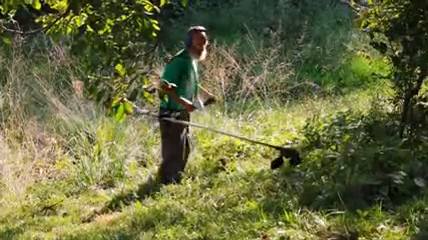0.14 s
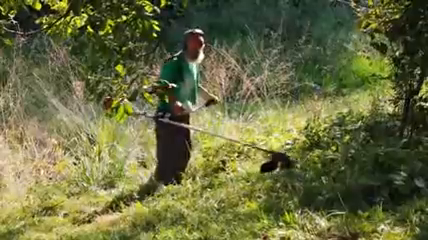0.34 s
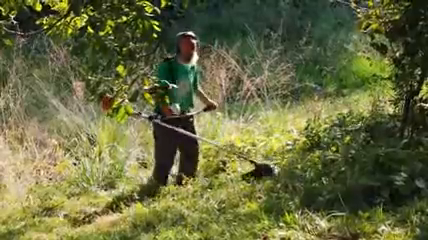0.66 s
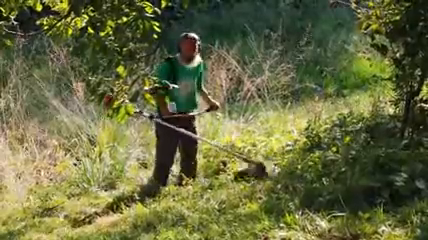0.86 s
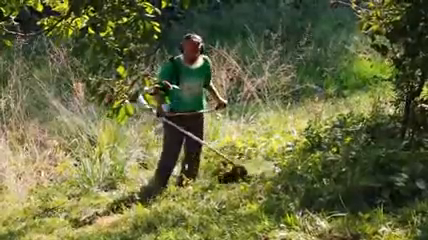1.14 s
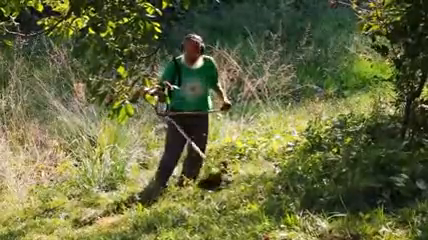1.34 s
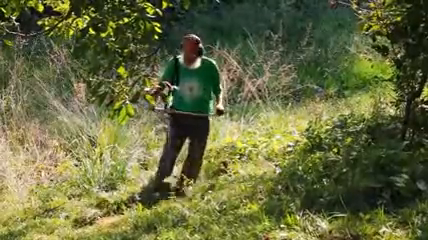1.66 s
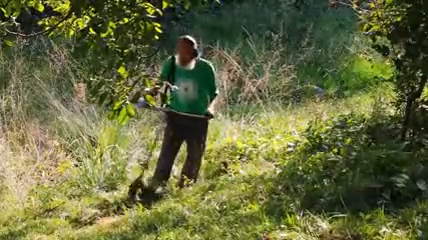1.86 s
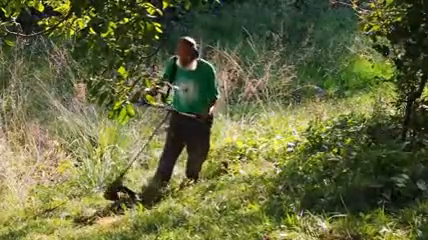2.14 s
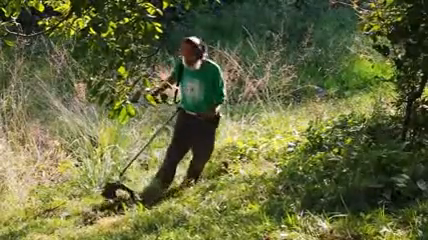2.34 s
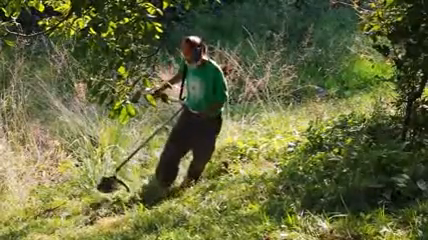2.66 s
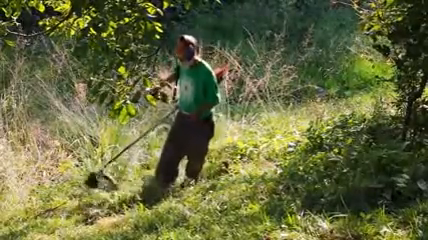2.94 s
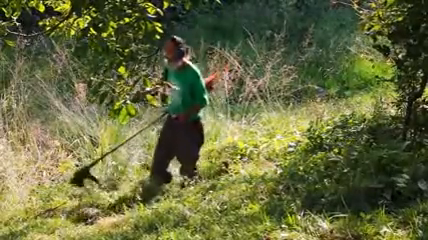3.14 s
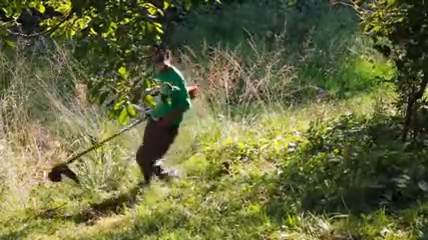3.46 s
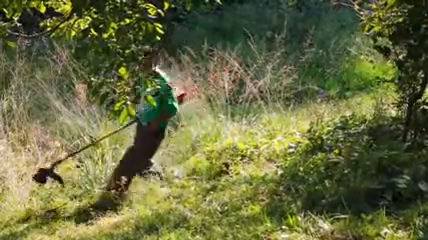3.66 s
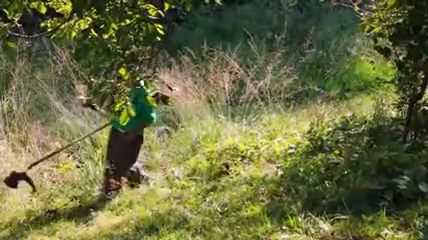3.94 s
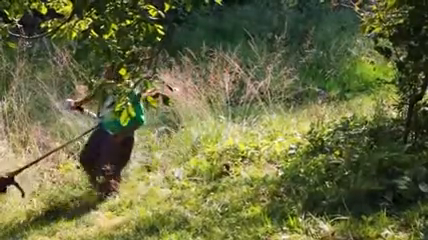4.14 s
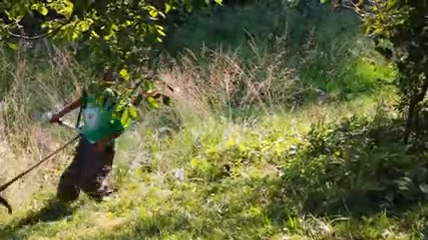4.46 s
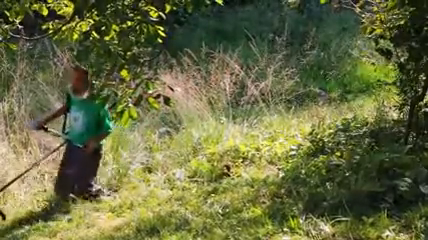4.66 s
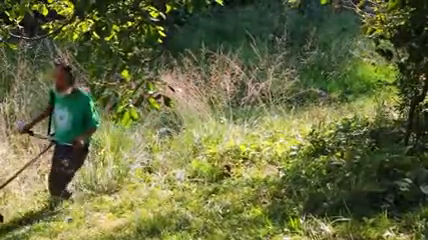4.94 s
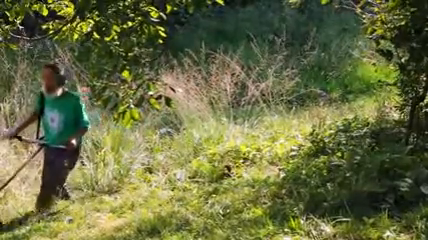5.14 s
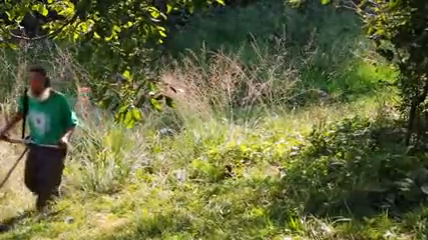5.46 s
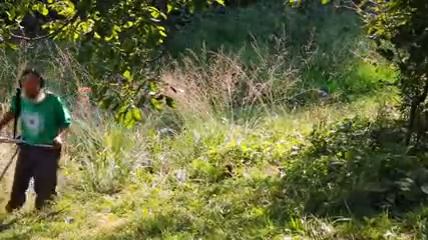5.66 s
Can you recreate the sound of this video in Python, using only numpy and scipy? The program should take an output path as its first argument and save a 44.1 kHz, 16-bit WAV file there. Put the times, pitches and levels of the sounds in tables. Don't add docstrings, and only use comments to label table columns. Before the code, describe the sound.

A brush cutter swings through long grass on an open slope, mono, close and dry. The continuous buzz and airy hiss sag slightly in pitch under load. Sharp woody snaps cluster early, with scattered ticks afterwards. Soft low rustle and wind thumps lie beneath. As the machine turns, its engine roar and high whine grow, then ease; the line tips fizz brighter at the end.

```python
import sys
import numpy as np
from scipy import signal
from scipy.io import wavfile
from scipy.ndimage import uniform_filter1d

SR = 44100
rng = np.random.default_rng(int(sys.argv[2]) if len(sys.argv) > 2 else 0)


def volts_from_db(level):
    exponent = np.asarray(level, float) / 20
    return 10 ** exponent


def materialize(psi):
    bounded = np.clip(np.atleast_2d(psi).T, -1, 1)
    quanta = np.round(bounded * 32767).astype(np.int16)
    wavfile.write(sys.argv[1], SR, quanta)


N = 255780


def evened(x):
    return x / np.sqrt(np.mean(x ** 2) + 1e-20)


def curves(rows):
    s, *columns = np.transpose(rows)
    return [np.interp(np.arange(N) / SR, s, c) for c in columns]


def bell(s, half_s):
    coarse_s = np.arange(0, N, 16) / SR
    return np.repeat(np.exp(-((coarse_s - s) / half_s) ** 2), 16)[:N]


def swells(rows):
    return sum(volts_from_db(db) * bell(s, half_s) for s, half_s, db in rows)


def drift(per_s):
    knots = uniform_filter1d(rng.standard_normal(400), 3)
    return evened(np.interp(np.arange(N) / SR * per_s * 3, np.arange(400), knots))


def noise(spectrum, patchy_db, size=512):
    frames, hz = 4 * N // size + 5, np.fft.rfftfreq(size, 1 / SR)
    real, imag, patches = rng.standard_normal((frames, len(hz), 3)).T
    patches = uniform_filter1d(patches, 7, 0)
    patches = evened(uniform_filter1d(patches, 16, 1))
    f, db = np.transpose(spectrum)
    colour_db = np.interp(np.log(hz + 1), np.log(f), db, -90, -90)[:, None]
    z = (real + 1j * imag) * volts_from_db(colour_db + patchy_db * patches)
    return evened(signal.istft(z, nperseg=size, noverlap=3 * size // 4)[1][:N])


def throb(turns, lag, turn_db, pass_db):
    angle = 2 * np.pi * (turns - lag)
    return evened(volts_from_db(turn_db * np.cos(angle) + pass_db * np.cos(2 * angle)))


# (time [s], half length [s], sag [turns/s])
SAGS = [
    (.76, .15, 1.12),
    (1.22, .2, -.22),
    (1.55, .11, .65),
    (2.0, .2, .1),
    (2.47, .15, .68),
    (2.78, .2, .25),
    (3.75, .2, .2),
    (4.3, .42, .45),
    (5.52, .17, .68),
    (5.8, .1, .2),
]


def shaft_turns():
    free_turns_per_s = 97.34
    sag = sum(depth * bell(s, half_s) for s, half_s, depth in SAGS)
    return np.cumsum(free_turns_per_s - sag) / SR - .1


# (time [s], line-pass hum [dB], nearness to the microphone [dB])
SWING = [(0, -34, -2.5), (.4, -35, 1), (.65, -35.5, 0.5), (.85, -38, -0.5), (1.1, -37.5, -1),
         (1.35, -35.5, 1.5), (1.6, -37, 2), (1.95, -38, 1.5), (2.18, -37.5, 2), (2.35, -39, 3),
         (2.54, -41.5, 1), (2.7, -39.5, 2.5), (3.07, -44, 1.5), (3.75, -41.5, 2), (4.5, -42, 2.5),
         (4.75, -40.5, 1), (5.22, -39.5, 1), (5.8, -39, 1.5)]


def swing():
    return curves(SWING)


# (time [s], how far it faces [0-1])
FACING = [(0, 0.18), (.3, 0.3), (.6, 0.24), (1.1, 0.1), (1.5, 0.36), (1.8, 0.43), (2.1, 0.7), (2.5, 0.45),
          (3.0, 0.67), (3.7, 1.0), (4.1, 1), (4.6, 0.55), (5.5, 0.55), (5.8, .5)]


def engine_facing():
    return curves(FACING)[0]


def housing():
    facing = engine_facing()
    shroud_db = -46.0 + 5.5 * facing
    exhaust_db = -56.0 + 7 * facing
    return shroud_db, exhaust_db


def line_hum(turns, hum_db):
    return volts_from_db(hum_db) * np.sqrt(2) * np.cos(2 * np.pi * 2 * turns)


# (multiple of the turn rate, level [dB])
ORDERS = [(1, -13), (2, 0), (3, -28.5), (4, -20.5), (5, -34.5), (6, -23.5), (7, -25.5), (8, -24.5),
          (9, -22), (10, -19.5), (11, -22), (12, -19.5), (13, -21.5), (14, -16), (15, -17.5), (16, -21),
          (17, -20), (18, -18.5), (19, -17.5), (20, -19.5), (21, -21), (22, -23.5), (23, -21.5), (24, -19),
          (25, -23.5), (26, -38)]
# (order, time [s], half length [s], level [dB])
FLARES = [(16, 0.36, 0.091, -45.5), (19.5, .27, 0.063, -48), (18.5, 0.34, 0.21, -53),
          (17.5, 0.28, 0.12, -50), (8, 0.92, 0.091, -59), (20, 1.24, 0.036, -52), (19, 1.32, 0.05, -49),
          (17, 1.52, 0.17, -48.5), (4, 1.54, 0.44, -57.5), (19, 2.24, 0.12, -55), (9, 2.15, 0.22, -57),
          (10, 2.1, 0.12, -69), (16, 2.46, 0.077, -49.5), (19, 2.72, .1, -55), (13.5, 2.8, 0.13, -56),
          (4, 3.26, 0.54, -58.5), (14, 3.4, .2, -64), (11, 3.78, 0.72, -61), (16, 3.85, 0.08, -47),
          (12, 4, 0.35, -57), (17, 4.1, .25, -55.5), (19, 4.25, .15, -53), (18.5, 4.37, 0.047, -46),
          (10, 4.77, 0.37, -55.5), (15, 5.0, .1, -56), (19, 5.3, 0.11, -57), (17, 5.45, 0.09, -57),
          (9, 5.56, 0.4, -55.5), (4, 5.62, 0.15, -60.5), (17, 5.78, .1, -52)]
# (time [s], half length [s], level [dB])
WHINE = [
    (.75, 0.51, -54),
    (2.0, 0.29, -49),
    (2.585, 0.38, -49),
    (3.1, 0.22, -55),
    (3.632, 0.37, -41),
    (4.034, 0.074, -45),
    (4.356, 0.078, -48),
    (4.953, 0.38, -48),
]


def shaft_orders(turns, hum_db):
    shroud_db, exhaust_db = housing()
    timing_scatter = 0.0017 * drift(per_s=22.0)
    flares = [*FLARES, *((18, *row) for row in WHINE)]
    half_orders = [(half, -30.0) for half in (13.5, 17.5, 18.5, 19.5)]
    out = np.zeros(N)
    for k, db in [*ORDERS, *half_orders]:
        if k == 2:
            continue
        waver_db, phase = drift(per_s=9.0), rng.random()
        if k == 1:
            around_db = -44.0 + 3.7 * bell(1.9, 1.0)
        elif k < 9:
            around_db = 0.63 * hum_db - 18.0
        elif k < 16:
            around_db = exhaust_db + 7.0
        else:
            around_db = shroud_db
        steady = volts_from_db(db + 2.5 + around_db + min(0.51 * k, 2.2) * waver_db)
        flare = swells([row for order, *row in flares if abs(order - k) < .25])
        size = steady + flare * volts_from_db(min(0.17 * k, 1.3) * waver_db)
        out += size * np.sqrt(2) * np.cos(2 * np.pi * (k * (turns + timing_scatter) + phase))
    return out


# (frequency [Hz], level [dB per Hz])
HISS = [(330, -69), (450, -18), (800, -23), (1500, -19.5), (2650, -11.5), (3200, -5), (4100, -3), (4700, 1),
        (6500, 0), (8000, -4.5), (9500, -17.5), (12000, -22)]


def line_hiss(turns, hiss_db):
    return volts_from_db(hiss_db + 0.8) * noise(HISS, patchy_db=0.84) * throb(turns, lag=0.12, turn_db=0.8, pass_db=0.92)


# (frequency [Hz], level [dB per Hz])
ROAR = [(1200, -39), (1500, -3.5), (1750, -0.5), (2200, -3), (2650, -13.5), (3300, -4)]
# (frequency [Hz], level [dB per Hz])
EXHAUST = [(450, -42), (800, -4), (1100, 2.5), (1400, 4), (1800, -5)]


def engine_roar(turns):
    shroud_db, exhaust_db = housing()
    shroud = volts_from_db(shroud_db - 2.5) * noise(ROAR, patchy_db=2.15, size=1024)
    shroud *= throb(turns, lag=-0.046, turn_db=1.7, pass_db=1.5)
    exhaust = volts_from_db(exhaust_db - 0.5) * noise(EXHAUST, patchy_db=-0.1, size=1024)
    exhaust *= throb(turns, lag=0.54, turn_db=-1.6, pass_db=3.0)
    return shroud + exhaust


def puffs(turns, lag, sharp, uneven_db):
    halves = 2 * (turns - lag) + 4
    strength_db = uneven_db * rng.standard_normal(int(halves[-1]) + 2)
    strength_db[1::2] -= 4.0
    burst = np.exp(-sharp * (halves % 1 - .5) ** 2)
    away = np.clip(1 - engine_facing(), 0, 1)
    return evened(0.4 + 0.68 * away ** 2 + volts_from_db(strength_db[halves.astype(int)]) * burst)


# (frequency [Hz], level [dB per Hz])
FIZZ = [(6000, -9), (9000, 3.5), (10500, -1.5), (11300, -1), (12100, 1), (13000, 0.5), (15500, -3),
        (17000, -24)]
# (time [s], fizz gain [dB])
SHREDS = [
    (.07, 3),
    (.44, 10),
    (.5, 8),
    (.52, 3),
    (.58, 5),
    (.6, 4),
    (.84, 8.5),
    (.92, 3),
    (1.73, 6),
]


def tip_fizz(turns, hiss_db):
    shred_db = sum(db * bell(s, 0.013) for s, db in SHREDS)
    round_db = 4.0 * bell(5.8, .35)
    fizz_db = hiss_db - 12.5 + round_db + shred_db
    return volts_from_db(fizz_db) * noise(FIZZ, patchy_db=0.7) * puffs(turns, lag=-.05, sharp=13.0, uneven_db=2.5)


# (frequency [Hz], level [dB per Hz])
BUFFET = [(15, -10), (28, 1.5), (42, -6), (60, -6), (90, -16.5), (150, -31)]
# (time [s], half length [s], level [dB])
GUSTS = [(.05, .06, -59), (.25, 0.15, -53), (.6, 0.089, -62), (1.5, 0.15, -57), (1.727, 0.024, -50),
         (1.984, .03, -37.5), (2.145, 0.34, -50), (2.2, .03, -46), (2.35, .025, -41), (2.62, 0.069, -56),
         (2.73, .03, -51), (3.05, .1, -63), (5.386, .025, -42)]


def wind():
    calm_db = -65
    return (volts_from_db(calm_db) + swells(GUSTS)) * noise(BUFFET, patchy_db=-0.5, size=2048)


# (frequency [Hz], level [dB per Hz])
RUSTLE = [(70, -12), (110, -31), (160, 0.5), (230, -8.5), (280, -3), (340, -8), (600, -13), (1000, -7.5)]
# (time [s], half length [s], level [dB])
BRUSHES = [(.02, 0.063, -64), (0.413, 0.053, -64), (0.608, 0.056, -55), (0.88, 0.13, -56.5),
           (1.527, 0.12, -56), (1.886, 0.15, -62.5), (2.266, 0.18, -64), (5.417, 0.098, -56),
           (5.745, 0.17, -63), (1.2, 0.12, -65), (2.9, .3, -80)]


def rustle():
    still_db = -66
    brushes = volts_from_db(still_db) + swells(BRUSHES)
    return brushes * volts_from_db(4.5) * noise(RUSTLE, patchy_db=-0.4, size=2048)


def snap(ring_db, bright_db):
    t = np.arange(600) / SR
    whip_s = .000045 * volts_from_db(.3 * ring_db)
    u = (t - .0003) / whip_s
    whip = -np.sin(1.4 * u + .4) * np.exp(-u ** 2 / 5)
    spit = volts_from_db(bright_db + 3.0) * np.cos(2 * np.pi * 11500 * t) * np.exp(-((t - .0003) / .00006) ** 2)
    late = np.maximum(t - .0002, 0)
    ring_hz = rng.uniform(3000, 3700)
    ring = volts_from_db(ring_db - 10) * np.sin(2 * np.pi * ring_hz * late) * np.exp(-late / .0006)
    crackle = volts_from_db(-20) * rng.standard_normal(600) * np.exp(-late / .0015) * (late > 0)
    return signal.lfilter(*signal.butter(2, 2200, "high", fs=SR), whip + spit + ring + crackle)


# (time [s], peak [dB], woody ring near 3 kHz [dB], brightness [dB])
SNAPS = [(0.0701, -19, 2, 1), (0.4247, -10, 4, -7), (0.4452, -11, 2, -8), (0.476, -17, 1, -13),
         (0.4862, -10.5, -4, -13), (0.4963, -11, 0, -8), (0.5015, -18, -1, -7), (0.5066, -19, -6, -8),
         (0.5170, -21, 2, -8), (0.5794, -19, -2, -4), (0.5987, -17, -6, -4), (0.6611, -19, 1, -11),
         (0.7124, -16, -1, -12), (0.7905, -17, 0, -8), (0.8169, -11, 1, -13), (0.8376, -17, 3, -8),
         (0.8483, -14, 1, -8), (0.9154, -14, 4, -6), (0.9206, -16, 4, -4), (0.9258, -14, 1, -13),
         (0.936, -19, 4, -6), (0.8267, -18, 0, -5), (1.7244, -18, 2, -13), (1.7299, -17, 3, -13),
         (1.7354, -12.5, -1, -6), (1.8197, -19, 3, -12), (1.8551, -14, 7, -14), (2.4593, -19, 0, -17),
         (2.756, -14, -3, -3), (5.7865, -13, -2, -4)]


def thick_stems():
    out = np.zeros(N + 600)
    for s, db, ring_db, bright_db in SNAPS:
        at = round((s - .0003) * SR)
        out[at:at + 600] += volts_from_db(db - 1.2) * snap(ring_db, bright_db)
    return out[:N]


# (time [s], half length [s], share of passes that cut [0-1])
BITES = [
    (.46, .06, .35),
    (0.765, 0.15, 0.6),
    (0.933, 0.033, 0.18),
    (1.74, .03, .2),
    (2.4, .25, 0.097),
    (5.5, 0.13, 0.27),
]


def thin_stems(turns, hiss_db):
    passes = np.flatnonzero(np.diff(np.floor(2 * turns + .53)))
    luck, size, kind = rng.random((len(passes), 3)).T
    idle_share = 0.041
    cutting = idle_share + sum(share * bell(s, half_s) for s, half_s, share in BITES)
    struck = np.clip((cutting[passes] - luck) * 8 + .5, 0, 1)
    strength = struck * volts_from_db(hiss_db[passes] + 8 + 5 * size)
    out = np.zeros(N)
    for k in range(4):
        train = np.zeros(N)
        train[passes] = ((kind * 4).astype(int) == k) * strength
        stem = snap(rng.uniform(4.5, 6.0), rng.uniform(-12, -3))
        out += signal.oaconvolve(train, stem)[:N]
    return out


# (time [s], level [dB], time to fall 60 dB [s])
CLUMPS = [
    (0.423, -31, 0.094),
    (.445, -38, 0.042),
    (0.816, -35, .1),
    (.838, -40, .06),
    (0.917, -41, 0.28),
    (1.724, -43, .08),
]


def thrash():
    woody = noise([(2300, -30), (2900, -3), (3400, 0), (3900, -4), (5000, -20)], patchy_db=1.5)
    t = np.arange(N) / SR
    return woody * sum(volts_from_db(db - 60 * np.maximum(t - s, 0) / t60) * (t > s) for s, db, t60 in CLUMPS)


# (time of deepest dip [s], depth [dB], recovery [s])
DUCKS = [
    (.47, 2, 0.093),
    (.53, 5.5, 0.019),
    (.875, 3, .05),
    (.96, 3, 0.28),
    (1.76, 2, 0.057),
    (1.88, 2, 0.065),
]


def ducking():
    t = np.arange(N) / SR
    lost_db = np.zeros(N)
    for s, db, back_s in DUCKS:
        recovery = np.exp(-np.maximum(t - s, 0) / back_s)
        lost_db += db * np.where(t < s, bell(s, 0.043), recovery)
    return lost_db


def scene():
    hum_db, near_db = swing()
    hiss_db = -35.0 + near_db
    turns = shaft_turns()
    bed = line_hum(turns, hum_db) + shaft_orders(turns, hum_db)
    bed += line_hiss(turns, hiss_db) + engine_roar(turns) + tip_fizz(turns, hiss_db)
    bed += wind() + rustle()
    snaps = thick_stems() + thin_stems(turns, hiss_db)
    snaps += volts_from_db(-25) * np.roll(snaps, 18)
    return (bed / volts_from_db(ducking()) + snaps + thrash())[None]


def top_cut(x):
    return signal.sosfilt(signal.butter(12, 17050, fs=SR, output="sos"), x)


def record(dry):
    ceiling, edge_hz = .42, 15790
    edge = signal.firwin(1023, edge_hz, window=("kaiser", 10), fs=SR)
    overloaded = ceiling * np.tanh(dry / ceiling)
    mix = signal.oaconvolve(overloaded, edge[None], "same")
    return top_cut(mix)


dry = scene()
out = record(dry)
materialize(out)
```